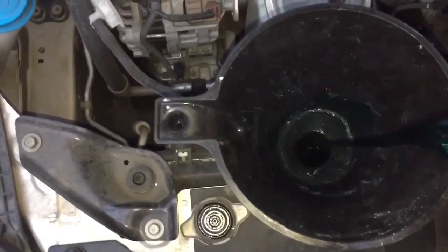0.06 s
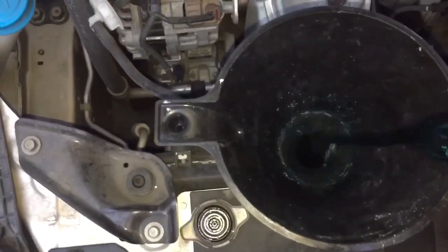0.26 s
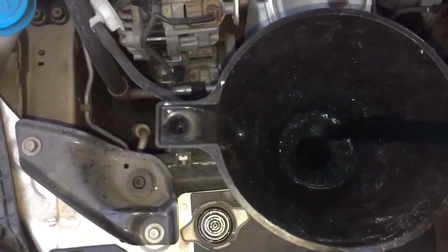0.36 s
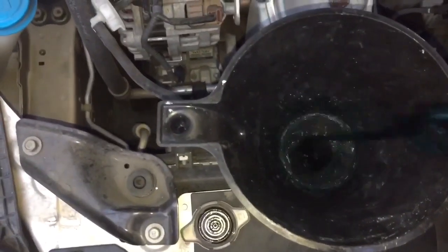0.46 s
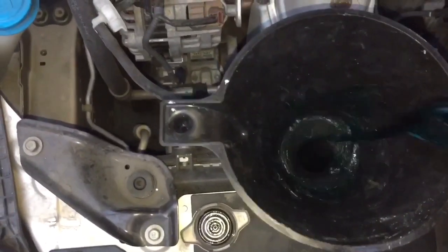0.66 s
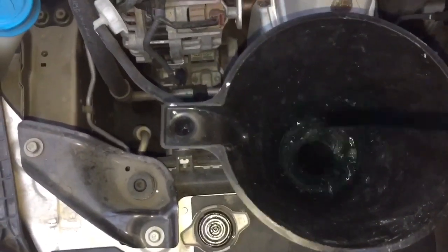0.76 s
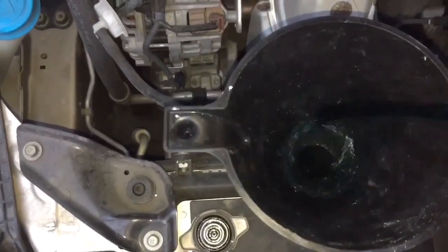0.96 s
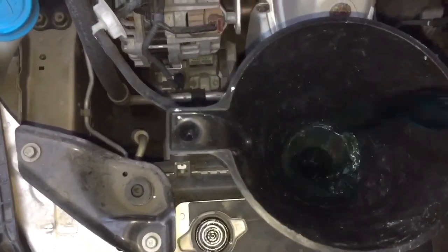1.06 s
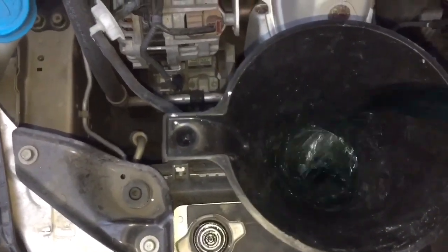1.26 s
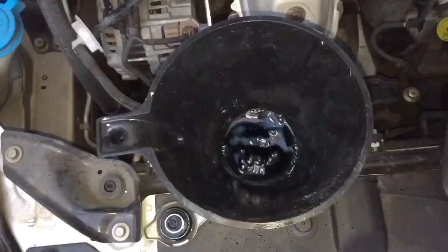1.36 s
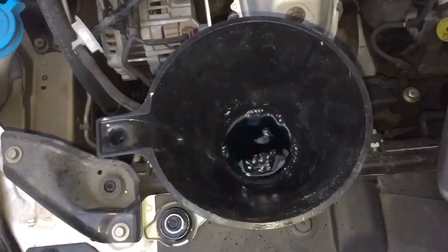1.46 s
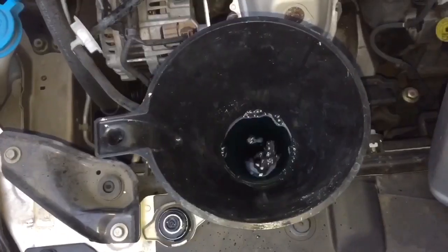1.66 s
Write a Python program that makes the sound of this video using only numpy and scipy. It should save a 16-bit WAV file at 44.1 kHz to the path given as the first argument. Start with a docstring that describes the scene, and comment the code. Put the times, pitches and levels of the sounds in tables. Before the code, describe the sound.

Coolant pouring in a light, drippy trickle into a funnel, ending suddenly in a low outdoor hum

```python
"""Coolant trickles from a jug into a plastic funnel over an engine bay, above a low outdoor rumble.
Bubbles blip near 2 kHz as gliding sines, droplets ping as short rough sines, splats are bursts of coloured noise.
Click-driven resonators make the finer trickle; short feedback delays make the funnel ring briefly.
The scene then cuts to a moment after the pour: only the rumble, louder noise in bands with hum lines,
and one bursting droplet are left."""
import sys
import numpy as np
from scipy import signal
from scipy.fft import rfft, irfft, next_fast_len
from scipy.io import wavfile
from scipy.ndimage import uniform_filter1d

SR = 44100
rng = np.random.default_rng(int(sys.argv[2]) if len(sys.argv) > 2 else 0)


def transcribe(u):
    """Save the signal u as a 16-bit wav file named by the first command-line argument.

    u: samples, shape (n,) or (channels, n), limited to [-1, 1]; the rate is SR.
    q: integer samples, one column per channel.
    """
    v = np.clip(np.atleast_2d(u).T, -1, 1)
    q = np.round(v * 32767).astype(np.int16)
    wavfile.write(sys.argv[1], SR, q)


N = 74970
CUT_S = 1.4113   # the pour ends here
LEAD = 88   # samples (2 ms) that a sound may start ahead of its time
MS = np.arange(-LEAD, 1500) / SR * 1000   # clock of one bubble, droplet or splat


def from_db(db):
    """Decibels to gain."""
    return 10 ** (np.asarray(db) / 20)


def rms_one(x):
    """Scale to rms 1."""
    return x / np.sqrt(np.mean(x ** 2) + 1e-20)


def at_hz(points, hz):
    """Read a spectrum in dB on a log-frequency axis."""
    points_hz, points_db = np.transpose(points)
    return np.interp(np.log(hz), np.log(points_hz), points_db)


def drift(rate_hz):
    """Slow random wander of spread 1: noise through a two-pole lowpass."""
    r = np.exp(-2 * np.pi * rate_hz / SR)
    noise = rng.standard_normal(N + SR)
    return rms_one(signal.lfilter([1], [1, -2 * r, r * r], noise)[SR:])   # skip the settling second


def resonate(x, hz, width_hz):
    """Two-pole resonance with gain 1 on top."""
    r = np.exp(-np.pi * width_hz / SR)
    poles = [1, -2 * r * np.cos(2 * np.pi * hz / SR), r * r]
    return signal.lfilter([(1 - r * r) / 2, 0, (r * r - 1) / 2], poles, x)


def highpass(x, hz):
    """Fourth-order Butterworth low cut."""
    return signal.sosfilt(signal.butter(4, hz, "high", fs=SR, output="sos"), x)


def rumble():
    """Outdoor rumble: half-octave bands of noise, each wavering, with a few hum lines; rms 1."""
    # Tone of the noise: (frequency [Hz], level [dB per Hz])
    noise_spectrum = [(25, -25.5), (50, -8.5), (127, -10), (190, -15.5), (380, -24.5), (450, -36.5),
                      (2000, -40.5), (5000, -55.5), (12000, -76.5)]
    # Hum lines, level against the noise: (frequency [Hz], width of the first resonance [Hz], level [dB])
    hum_lines = [(54.7, 36, -2), (117, 4.7, -3), (283.3, 16, -12.5), (366, 6.1, -20)]
    waver_db, waver_hz, low_cut_hz = 1.0, 16.7, 43.5
    edges = 25 * 2 ** np.arange(0, 9.6, .5)
    white = rng.standard_normal((2, N + SR))
    noise = 0
    for k, (low, high) in enumerate(zip(edges, edges[1:])):
        band_filter = signal.butter(3, [low, high], "band", fs=SR, output="sos")
        band = signal.sosfilt(band_filter, white[k % 2])[SR:]   # neighbours use different noise
        level_db = at_hz(noise_spectrum, np.sqrt(low * high)) + waver_db * drift(waver_hz)
        noise = noise + from_db(level_db) * band
    hum = 0
    for hz, width_hz, db in hum_lines:
        line = resonate(resonate(rng.standard_normal(N + SR), hz, width_hz), hz, hz)[SR:]
        hum = hum + from_db(db) * rms_one(line)
    return rms_one(highpass(rms_one(noise) + hum, low_cut_hz))


def clicks(per_s, spread_db):
    """Random clicks of uneven size and sign."""
    sizes = from_db(spread_db * np.minimum(rng.exponential(1, N), 4))
    signs = rng.choice([-1, 1], N)
    return sizes * signs * (rng.random(N) < per_s / SR)


def grains(spectrum, per_s, ring_ms, spread_db, gust_db, ticks, count):
    """Gusty clicks dealt to short resonators spread in pitch, plus ticks that ring them all; typical level 1."""
    ring_shortens = .65   # ring_ms holds at the lowest pitch; ring time falls as pitch to this power
    lowest_hz, highest_hz = spectrum[1][0], spectrum[-2][0]
    own_clicks = from_db(gust_db * drift(30)) * clicks(per_s, spread_db)
    dealt = rng.integers(0, count, N)
    out = 0
    for k, hz in enumerate(np.geomspace(lowest_hz, highest_hz, count)):
        # 60 dB decay time to resonance width
        width_hz = np.log(1000) / np.pi / (ring_ms / 1000) * (hz / lowest_hz) ** ring_shortens
        push = rms_one(own_clicks * (dealt == k)) + (-1) ** k * ticks + 1e-18
        ring = resonate(resonate(push, hz, width_hz), hz, 2 * width_hz)
        # log-spaced bands widen with pitch, so dB per Hz needs sqrt(hz)
        out = out + from_db(at_hz(spectrum, hz)) * np.sqrt(hz) * rms_one(ring)
    typical_power = np.median(uniform_filter1d(out ** 2, size=2000))
    return out / np.sqrt(typical_power)


def trickle():
    """Small bubbles and fine spray: resonators rung by random clicks and by drops that strike all pitches."""
    # Course of the trickle: (time [s], small bubbles level [dB], spray level [dB])
    course = [(0.0, -32.5, -36.5), (0.051, -37, -40), (0.089, -41, -47), (0.117, -40.5, -42),
              (0.191, -43.5, -45.5), (0.211, -35, -40), (0.332, -46, -49.5), (0.413, -36.5, -37.5),
              (0.447, -33, -44.5), (0.478, -38, -39.5), (0.491, -42.5, -61), (0.507, -56, -57.5),
              (0.533, -48.5, -54.5), (0.549, -38.5, -40), (0.605, -40, -32), (0.667, -38.5, -50),
              (0.698, -51, -63), (0.718, -41.5, -42), (0.755, -48, -50.5), (0.788, -37.5, -37),
              (0.825, -49, -52), (0.858, -37, -40), (0.886, -51.5, -60), (0.924, -52, -38),
              (0.949, -57, -64), (0.97, -40, -43.5), (1.069, -51, -55.5), (1.105, -44, -34),
              (1.133, -62.5, -63), (1.158, -49.5, -49), (1.168, -40.5, -35), (1.204, -53, -64.5),
              (1.227, -43.5, -47.5), (1.288, -55.5, -61), (1.311, -42, -44), (1.329, -59, -54.5),
              (1.357, -36, -33), (1.402, -51.5, -55.5)]
    # Tone of the small bubbles: (frequency [Hz], level [dB per Hz])
    small_spectrum = [(320, -62), (550, -31.5), (882, -10), (1250, -23), (2040, 1), (2430, -14.5),
                      (3080, -17), (3300, -39.5), (4290, -63.5), (7260, -120)]
    # Tone of the fine spray: (frequency [Hz], level [dB per Hz])
    spray_spectrum = [(1760, -40), (3000, -3), (4980, 3), (5580, 3.5), (7690, -4.5), (9530, -4),
                      (10700, -12.5), (15100, -15), (16000, -0.5), (16500, -36)]
    tick_decay_ms = .6   # time constant
    fall = np.exp(-1000 / tick_decay_ms / SR)
    tick_shape = signal.lfilter([1], [1, -fall], np.abs(clicks(per_s=75, spread_db=6)))
    ticks = rms_one(tick_shape * rng.standard_normal(N))
    small = grains(small_spectrum, per_s=1800, ring_ms=15.8, spread_db=2, gust_db=3,
                   ticks=from_db(-4) * ticks, count=20)
    spray = grains(spray_spectrum, per_s=8000, ring_ms=6.5, spread_db=4.5, gust_db=4,
                   ticks=from_db(-0.4) * ticks, count=32)
    s, small_db, spray_db = np.transpose(course)
    t = np.arange(N) / SR
    return from_db(np.interp(t, s, small_db)) * small + from_db(np.interp(t, s, spray_db)) * spray


def blip(attack_ms, length_ms, fade_db, bend):
    """Soft rise, then a fall, fade_db down at the end of the length; it steepens if bend is above 1."""
    attack_ms = min(attack_ms, length_ms / 2)
    risen = np.clip((MS + attack_ms / 2) / (attack_ms * 3 / 2), 0, 1)
    fallen = np.maximum(MS - attack_ms, 0) / (length_ms - attack_ms)
    return np.sin(np.pi / 2 * risen) ** 2 * from_db(-fade_db * fallen ** bend)


def place(timed_sounds):
    """Mix (time, sound) pairs on one track, the first 2 ms of each sound lying before its time."""
    track = np.zeros(N + SR)
    for s, sound in timed_sounds:
        start = int(s * SR)
        track[start:start + len(sound)] += sound
    return track[LEAD:N + LEAD]


def droplets():
    """Pinging droplets: short sines roughened by noise resonating at the same pitch."""
    # Droplets: (time [s], level [dB], pitch [Hz])
    pings = [(0.0069, -24, 3760), (0.017, -24, 5500), (0.0234, -29, 4600), (0.039, -23.5, 6360),
             (0.0517, -20.5, 5470), (0.0577, -27, 5800), (0.1712, -24.5, 6100), (0.1754, -32, 5540),
             (0.1816, -24, 5740), (0.2008, -19.5, 5750), (0.2055, -24.5, 5260), (0.2117, -23, 6430),
             (0.3092, -30.5, 5120), (0.3778, -25, 4000), (0.3924, -18.8, 3700), (0.414, -32, 5600),
             (0.4388, -22, 5260), (0.4513, -26, 4530), (0.47, -29.5, 5120), (0.4746, -23.5, 4050),
             (0.54, -26.5, 5480), (0.5524, -29, 6200), (0.5712, -23, 6200), (0.595, -15.5, 3350),
             (0.6019, -22, 3370), (0.609, -23, 6310), (0.6126, -24, 5450), (0.6183, -29, 5500),
             (0.7675, -16, 5330), (0.7805, -26, 4320), (0.8513, -22, 5850), (0.9029, -24.5, 5410),
             (0.9557, -33, 6900), (0.9717, -27, 5600), (0.993, -18.5, 5900), (1.1, -19, 6170),
             (1.1628, -21.5, 4680), (1.1698, -28.5, 3900), (1.1938, -34, 5460), (1.2232, -29, 4800),
             (1.336, -29, 5400), (1.348, -19, 4670), (1.3574, -22.5, 6760), (1.364, -20.5, 5300),
             (1.4078, -28, 6950), (1.451, -34.5, 11400)]
    roughness = 0.47   # noise rms against a sine of peak 1
    shape = blip(attack_ms=0.12, length_ms=1.38, fade_db=7.5, bend=.9)
    sounds = []
    for s, db, hz in pings:
        noise = rng.standard_normal(len(MS))
        rough = rms_one(resonate(resonate(noise, hz, 1300), hz, 1300))
        tone = np.sin(2 * np.pi * hz * MS / 1000) + roughness * rough
        sounds.append((s, from_db(db) * shape * tone))
    return place(sounds)


def bubbles():
    """Large bubbles: sines whose pitch glides steadily while they die away."""
    # Bubbles: (time [s], level [dB], pitch at half length [Hz], length [ms], glide [Hz per ms])
    large_bubbles = [(0.0074, -55, 2160, 1.1, 16), (0.021, -20.5, 1790, 1.1, 20),
                     (0.0545, -20.5, 1740, 1.1, 5), (0.145, -22, 2030, 2.9, 32),
                     (0.198, -20, 2020, 1.9, 20), (0.2117, -7.5, 2420, 0.92, 20),
                     (0.2944, -20, 1840, 1, 17), (0.3936, -20.5, 1770, 0.59, 20),
                     (0.4018, -8.1, 1880, 3.2, 12), (0.4137, -13, 2030, 1.55, -2),
                     (0.4375, -29, 1350, 7.5, 30), (0.4518, -16, 1970, 1.7, 20),
                     (0.4637, -17, 2230, 4.1, 20), (0.485, -21.5, 2200, 2.6, 20),
                     (0.5155, -30.5, 1820, 2.3, 20), (0.5877, -16, 2190, 4.4, 21),
                     (0.5942, -14, 2380, 1.15, 28), (0.601, -27, 2220, 4.2, 17),
                     (0.6152, -18.5, 2040, 1.6, 22), (0.6413, -25, 1514, 14, 16),
                     (0.6463, -15.5, 2450, 1.45, 20), (0.664, -21, 2100, 1.6, 20),
                     (0.6969, -25, 1860, 1.15, 20), (0.7102, -29, 1480, 1.4, 21.5),
                     (0.7368, -29.8, 1660, 2.6, 20), (0.769, -25, 2170, 3.5, 10.5),
                     (0.7793, -22.5, 1860, 1.4, 19), (0.78, -36.5, 780, 6.6, 20.5),
                     (0.7907, -21.5, 2370, 1.4, 26), (0.8363, -19, 2100, 0.89, 26),
                     (0.8513, -0.4, 1981, 3.84, -25), (0.8548, -7.5, 2155, 3.3, 7),
                     (0.8603, -16, 2230, 1.3, 15), (0.896, -33, 1770, 1.7, 13),
                     (0.968, -26.5, 2214, 9.6, 20), (0.9724, -16.5, 2190, 1.5, 20),
                     (0.992, -5, 1758, 2.58, -79), (1.045, -39.5, 900, 4.1, 20),
                     (1.077, -33.5, 2650, 6.2, 9.5), (1.1757, -24.5, 1780, 2.0, 18),
                     (1.212, -37, 254, 15.5, 17.5), (1.2183, -20, 854, 6.5, 9.5),
                     (1.2261, -15.5, 1013, 3.5, 51.5), (1.241, -34, 1760, 2.6, 17),
                     (1.2543, -30.5, 1690, 4, 18), (1.2693, -27.5, 1930, 5.9, 12),
                     (1.3028, -17, 2050, 5.8, 23.5), (1.3146, -18, 2190, 1.8, 15.5),
                     (1.348, -10, 2170, 2.45, 16), (1.3648, -0.5, 2220, 1.43, 20),
                     (1.3749, -14.5, 2440, 0.96, 25.5)]
    sounds = []
    for s, db, hz, length_ms, glide in large_bubbles:
        cycles = (hz + glide * (MS - length_ms) / 2) * MS / 1000
        attack_ms = 0.71 + 0.071 * length_ms   # long bubbles rise more slowly
        shape = blip(attack_ms, length_ms, fade_db=13, bend=1.6)
        sounds.append((s, from_db(db) * shape * np.sin(2 * np.pi * cycles)))
    return place(sounds)


def splats():
    """Splats of spray: short bursts of noise, part resonant and part broad treble."""
    # Splats: (time [s], peak level [dB], centre [Hz])
    spray_bursts = [(0.1233, -28, 8900), (0.136, -18.5, 8350), (0.1633, -31.6, 8720), (0.1982, -15.5, 7300),
                    (0.2109, -29, 8400), (0.2214, -26, 9100), (0.2995, -26.5, 9300), (0.39, -27.5, 12740),
                    (0.4129, -38, 8800), (0.4366, -33, 7850), (0.4436, -28, 9440), (0.5145, -28.5, 12600),
                    (0.552, -14, 8100), (0.594, -17, 13500), (0.604, -27, 8880), (0.612, -10, 8600),
                    (0.6191, -22, 8500), (0.7254, -29, 12800), (0.7366, -21.5, 8700), (0.7953, -18.5, 8800),
                    (0.8147, -21, 9200), (0.982, -33, 9700), (1, -24, 8800), (1.0245, -23, 8900),
                    (1.1004, -16.5, 11900), (1.1089, -25, 9400), (1.1652, -21, 13100), (1.215, -29, 8750),
                    (1.2372, -25.5, 8330), (1.3253, -26.5, 8500), (1.3483, -12, 8400),
                    (1.3582, -21.5, 8000)]
    width_hz, broad_db = 1200, -2   # resonance width; broad treble against the resonant part
    shape = blip(attack_ms=0.27, length_ms=1.6, fade_db=12, bend=1.1)
    sounds = []
    for s, db, hz in spray_bursts:
        noise = rng.standard_normal(len(MS))
        resonant = rms_one(resonate(noise, hz, width_hz))
        broad = rms_one(highpass(noise[::-1], 6500))   # reversed, so unlike the resonant part
        burst = shape * (resonant + from_db(broad_db) * broad)
        sounds.append((s, from_db(db) * burst / np.abs(burst).max()))
    return place(sounds)


def funnel(x):
    """Short feedback delays inside funnel and engine bay, duller and thinner on every round."""
    t60_s, level_db = 0.11, -20.5   # decay time before the filters' own losses; level of the ring
    high_cut_hz, low_cut_hz = 2300, 500
    size = next_fast_len(N + SR // 4)
    hz = np.arange(size // 2 + 1) * SR / size
    dull = 1 / (1 + 1j * hz / high_cut_hz)
    thin = 1 / (1 - 1j * low_cut_hz / (hz + 1))
    wet = 0
    for k, lag_s in enumerate([.0043, .0059, .0071, .0089, .0107, .0131]):
        loop = from_db(-60 * lag_s / t60_s) * dull * thin * np.exp(-2j * np.pi * hz * lag_s)
        wet = wet + (-1) ** k * loop / (1 - loop)   # sum of all rounds
    return x + from_db(level_db) * irfft(rfft(x, size) * wet, size)[:N]


def scene():
    """The pour up to the cut, then the louder rumble and the last droplet."""
    # Rumble while pouring: (time [s], level [dB])
    rumble_course = [(0, -48.5), (.4, -46.5), (.64, -51), (1.0, -51), (1.41, -47)]
    rumble_after_db = -33.5
    t = np.arange(N) / SR
    pouring = t < CUT_S
    loud = droplets() + bubbles() + splats()
    # the ring of the pour stops at the cut
    water = np.where(pouring, funnel(loud + trickle()), funnel(loud * ~pouring))
    rumble_db = np.where(pouring, np.interp(t, *np.transpose(rumble_course)), rumble_after_db)
    return (water + from_db(rumble_db) * rumble())[None]


def record(dry):
    """Smooth saturation holds the loudest bubbles under a ceiling; a steep lowpass cuts the top."""
    ceiling, stop_hz = .725, 16800   # 60 dB down from stop_hz up
    clipped = dry / (1 + np.abs(dry / ceiling) ** 8) ** (1 / 8)
    return signal.sosfilt(signal.cheby2(12, 60, stop_hz, fs=SR, output="sos"), clipped)


dry = scene()
out = record(dry)
transcribe(out)
```